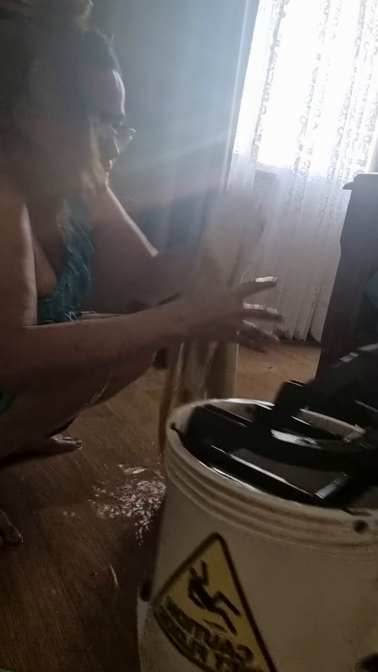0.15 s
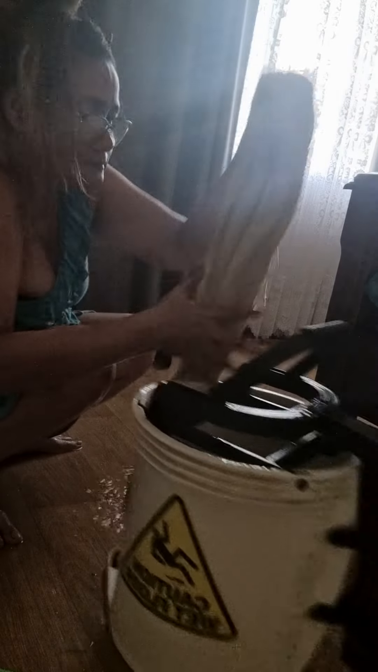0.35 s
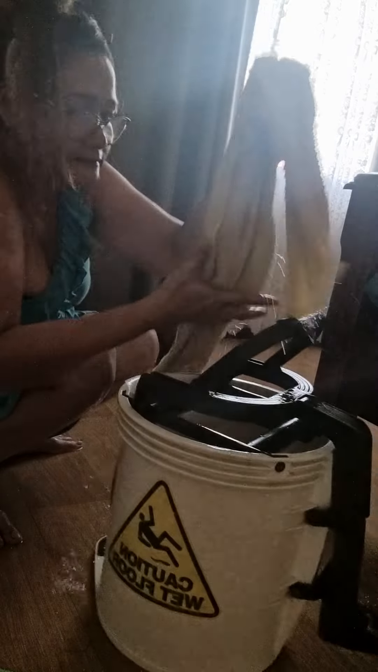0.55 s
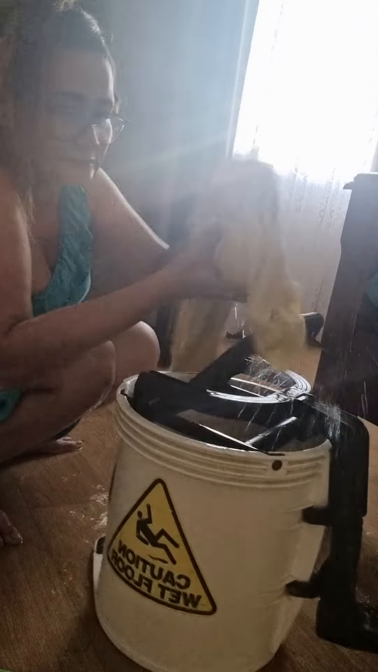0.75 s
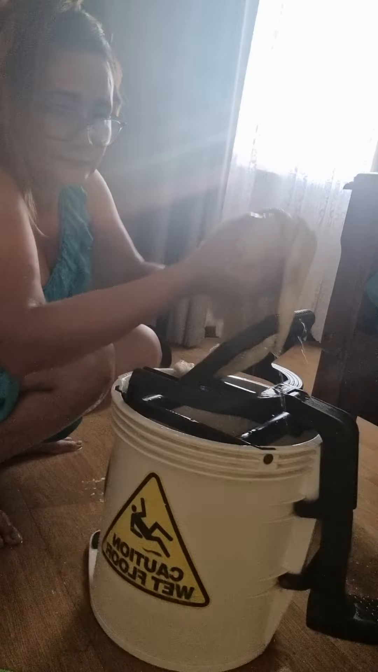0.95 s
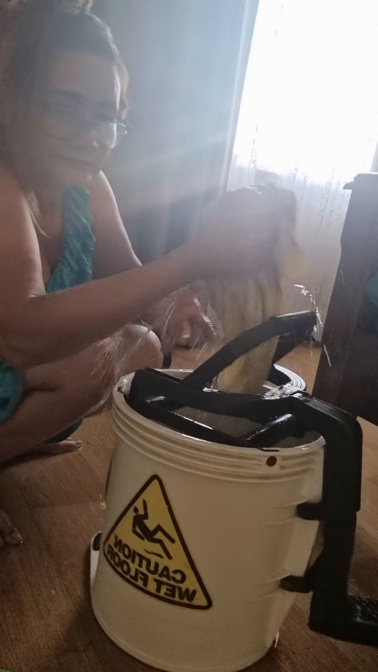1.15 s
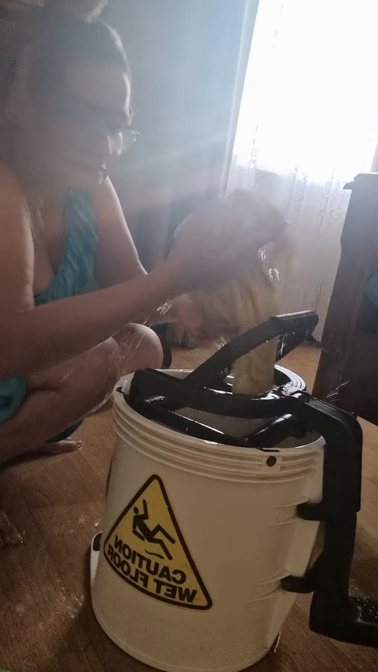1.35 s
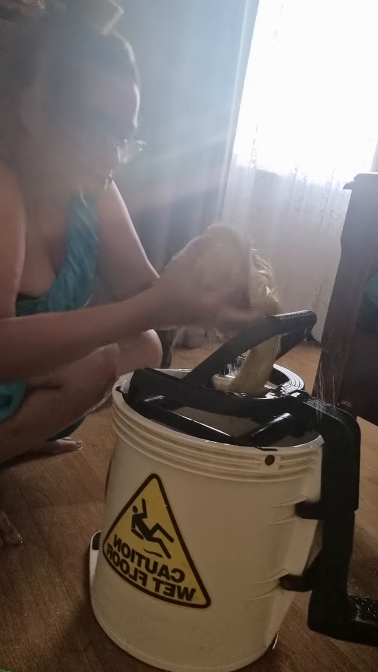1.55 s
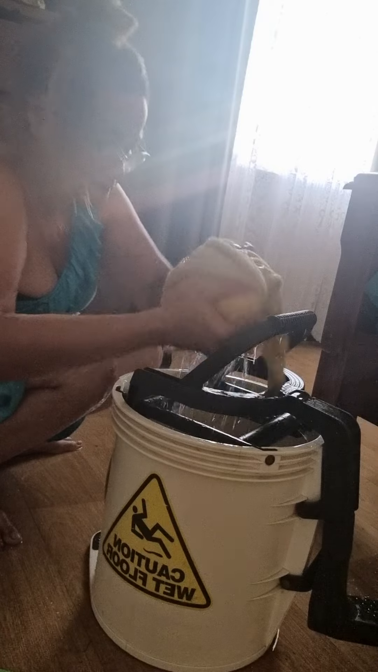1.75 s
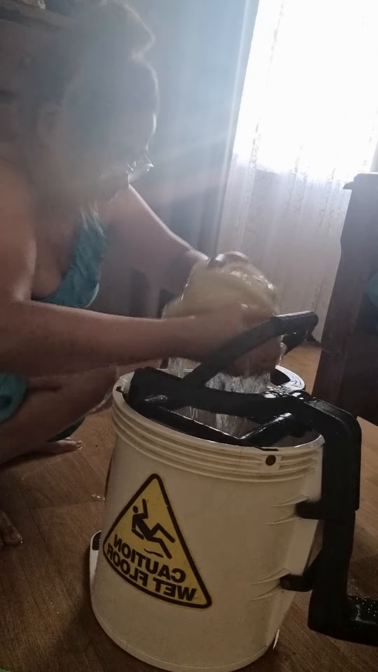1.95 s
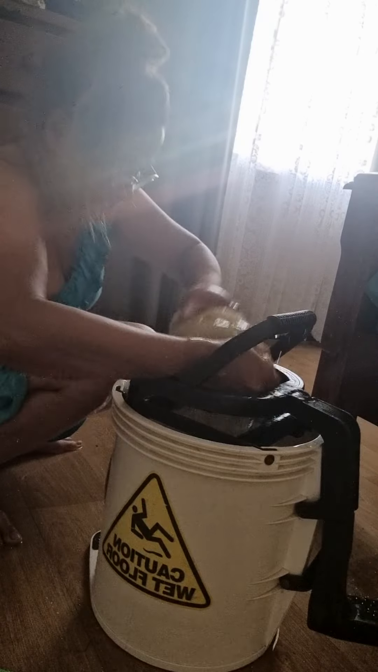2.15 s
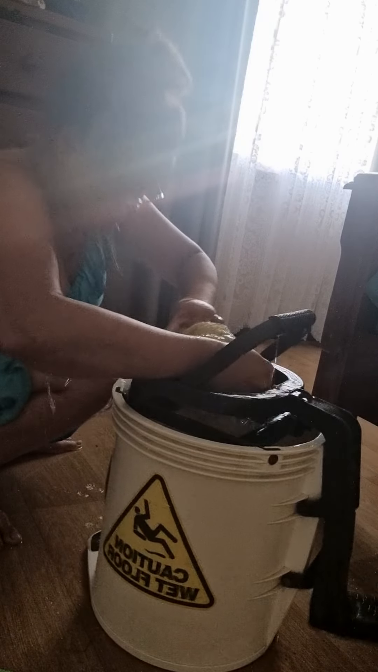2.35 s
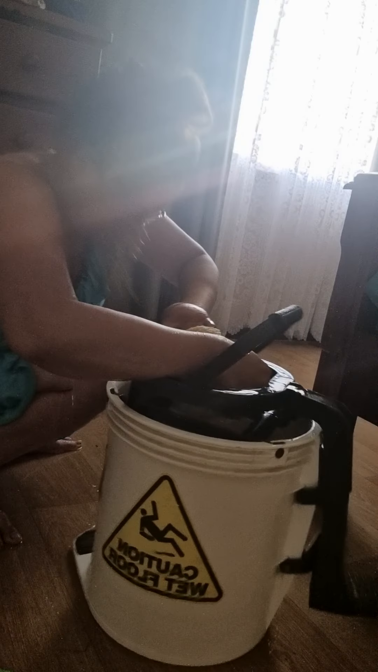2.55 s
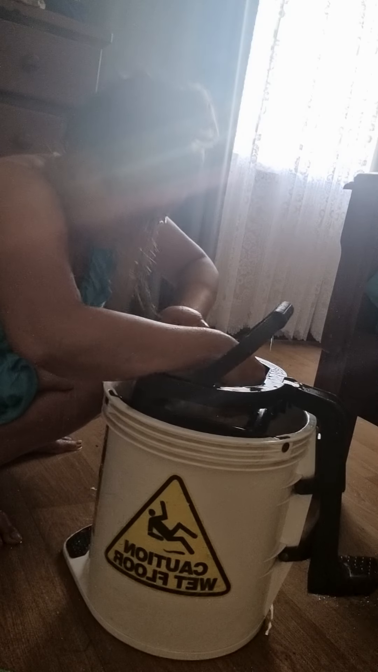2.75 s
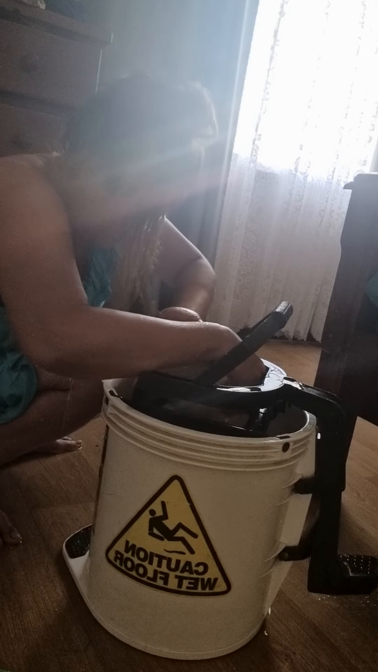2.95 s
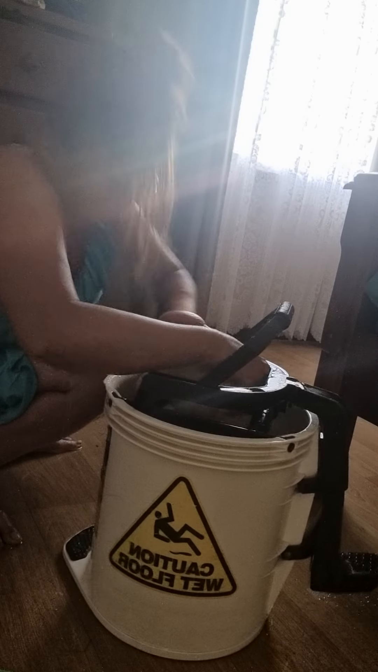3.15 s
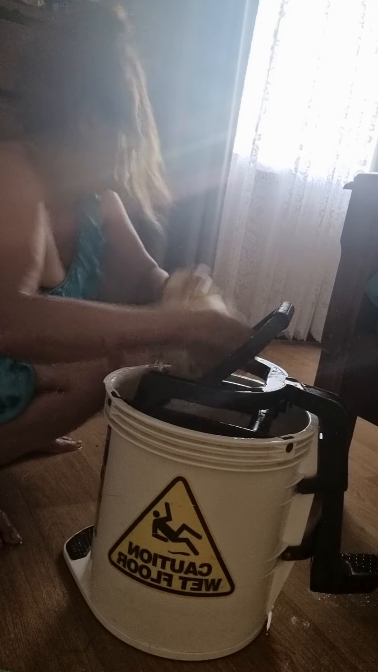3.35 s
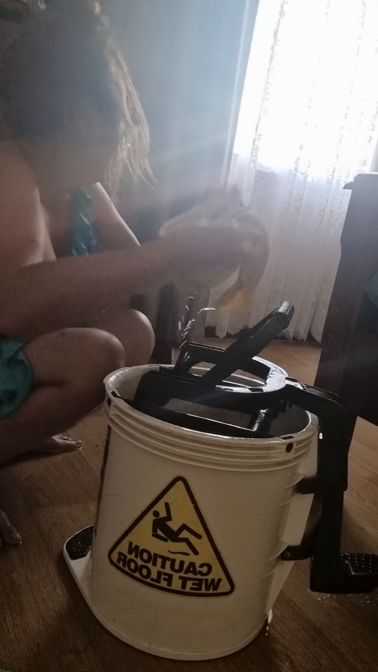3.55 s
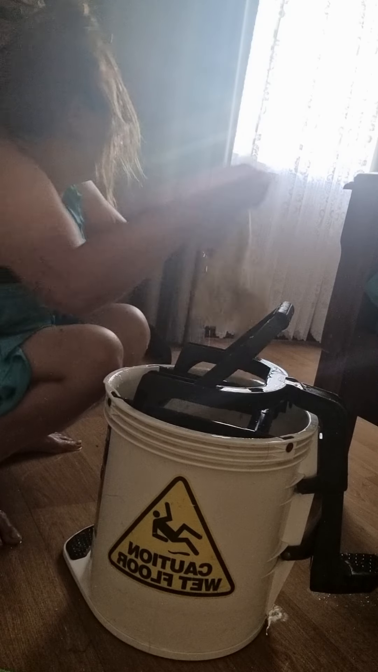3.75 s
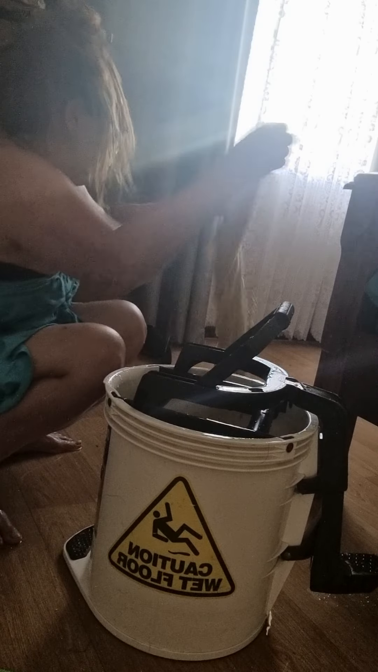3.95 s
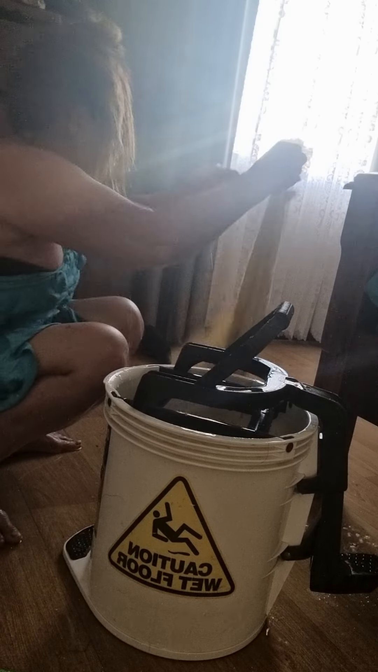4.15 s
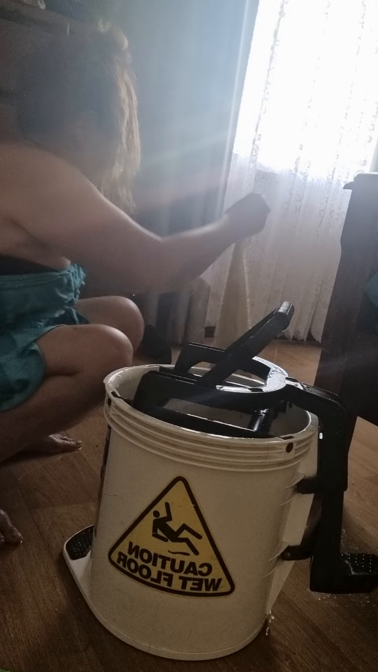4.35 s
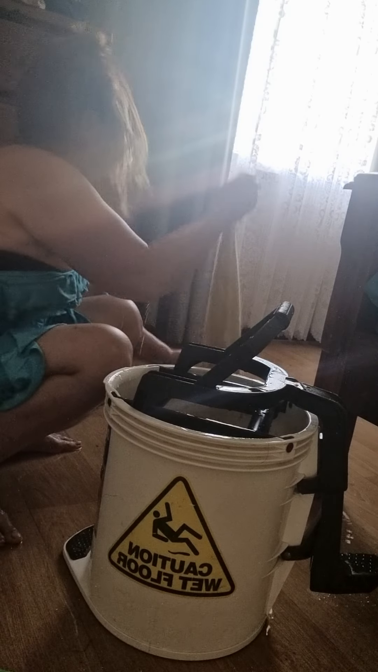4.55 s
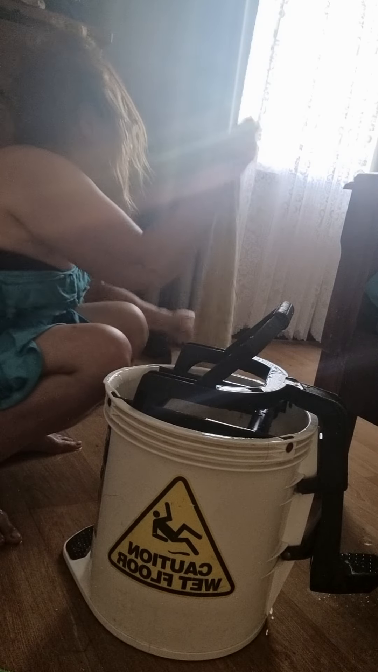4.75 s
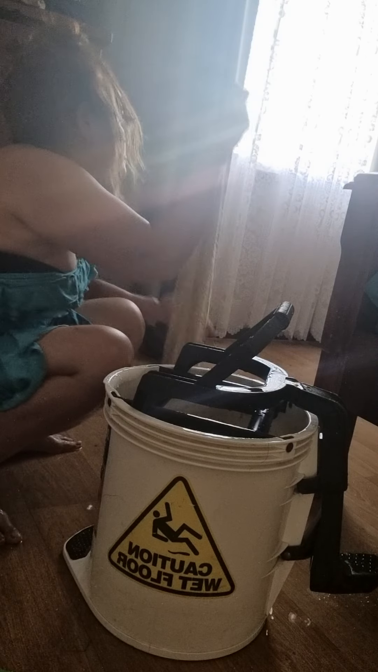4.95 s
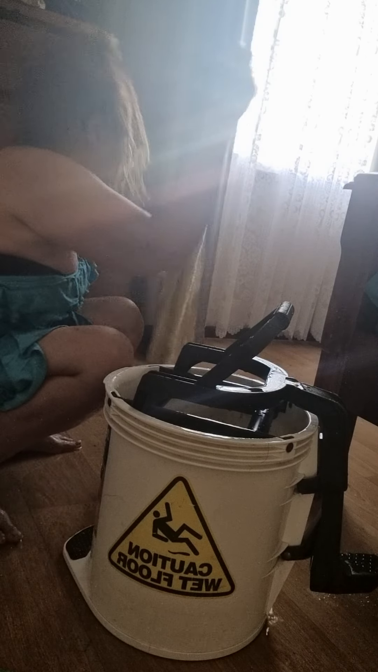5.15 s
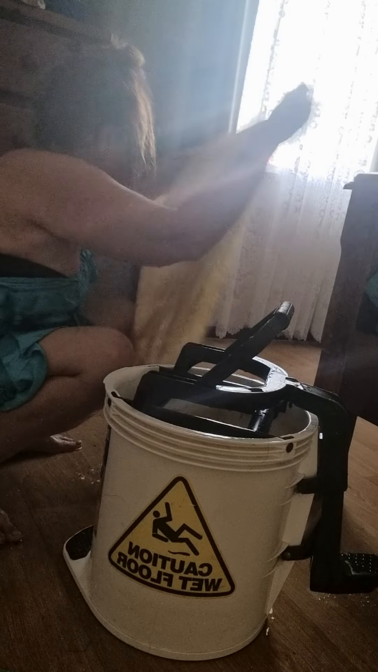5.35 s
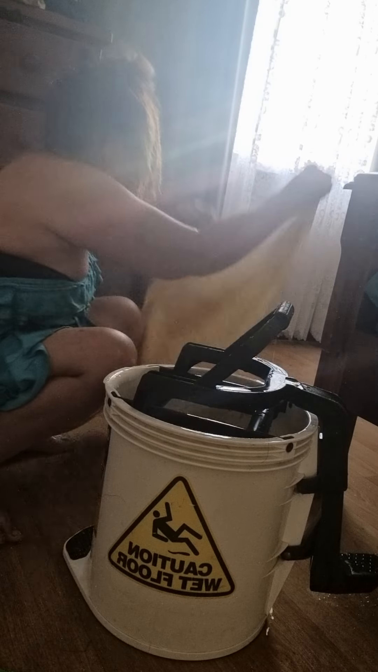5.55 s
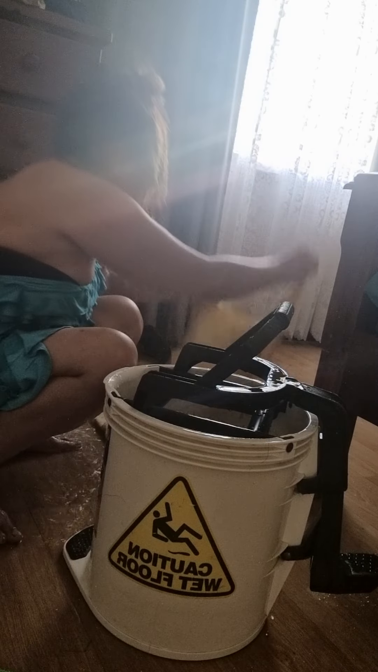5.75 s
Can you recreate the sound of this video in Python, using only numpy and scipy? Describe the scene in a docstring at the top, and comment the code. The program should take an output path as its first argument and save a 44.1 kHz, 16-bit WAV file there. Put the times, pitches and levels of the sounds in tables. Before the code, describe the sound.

A bucket rumbles and clacks at the start, with a dripping cloth swished and slapped beside it. After small splashes, one long squeeze sends a bright, gurgling rush of water into the hollow pail, among sharp plastic ticks. Shorter trickles and single bubble plops fade away. Later come a light knock and squeak, tiny wet chirps and a soft flop. Recorded near in stereo, in a small, lightly echoing indoor room.

```python
"""Small room with a wooden floor: a plastic mop bucket is dragged, and a soaked cloth is lifted and wrung over it.
Four squeezes drive plunge, spatter and spray (filtered random impacts) with bubble swarms, then drips.
Splashes, squelches, single bubbles and booming gulps are placed from tables; the cloth slaps down wet.
Plastic ticks are damped noise rings, bumps are short low tones, shoves are rumbling noise.
Wet slips chirp, rubbed plastic squeaks, and room air and a wavering hum lie beneath."""
import sys
import numpy as np
from scipy import signal
from scipy.fft import rfft, irfft, next_fast_len
from scipy.io import wavfile
from scipy.ndimage import uniform_filter1d, map_coordinates

SR = 44100
rng = np.random.default_rng(int(sys.argv[2]) if len(sys.argv) > 2 else 0)


def put_to_file(sound):
    """Save the sound as 16-bit audio at rate SR, in the file named by the first command-line argument."""
    columns = np.atleast_2d(sound).T  # one column per channel
    safe = np.clip(columns, -1, 1)
    whole_steps = np.round(safe * 32767)
    wavfile.write(sys.argv[1], SR, whole_steps.astype(np.int16))


N = 256220

# Event levels in all tables are before the mix gains; spectra are relative.
# sheets of water and wet cloth landing: start_s, rise_s, fade_s, slap_db, spatter_db, spray_db
SPLASH_EVENTS = [(0.393, 0.004, 0.04, -53, -60, -61), (0.418, 0.0013, 0.038, -41.5, -56, -51),
                 (0.452, 0.022, 0.014, -33.5, -45, -43), (0.646, 0.0023, 0.0094, -52, -61, -56),
                 (0.833, 0.02, 0.038, -49, -49.5, -52), (0.97, 0.03, 0.24, -55.5, -65, -64),
                 (1.349, 0.012, 0.12, -65, -49.5, -50), (1.474, 0.014, 0.021, -48, -52, -47.5),
                 (1.651, 0.00081, 0.058, -76.5, -49.5, -76), (1.929, 0.0021, 0.026, -53, -44, -43.5),
                 (2.074, 0.0092, 0.028, -41.5, -57, -48), (2.396, 0.006, 0.02, -36, -58, -61),
                 (2.645, 0.0049, 0.025, -51.5, -46, -46.5), (2.944, 0.0041, 0.046, -49, -57, -54),
                 (3.322, 0.0044, 0.02, -51.5, -62, -55), (3.538, 0.0046, 0.029, -57, -55, -49),
                 (3.645, 0.0051, 0.037, -78, -57.5, -60), (4.042, 0.0034, 0.052, -50.5, -48, -46),
                 (4.315, 0.0022, 0.033, -57, -64, -64), (4.341, 0.0065, 0.14, -49.5, -55.5, -54),
                 (4.478, 0.003, 0.012, -69, -62, -60), (5.734, 0.0047, 0.12, -41, -41.5, -44.5)]
# spectrum of water spattering: freq_hz, density_db
SPATTER_SPECTRUM = [(500, -14.5), (1200, -12), (2200, -16.5), (3200, 2.5), (4300, 1), (5800, 1.5),
                    (7500, -5.5), (14000, -32)]
# spectrum of fine spray, also used for tick snaps: freq_hz, density_db
SPRAY_SPECTRUM = [(2500, -15), (5500, 7), (7500, 5.5), (10500, -0.5), (12500, -0.5), (16000, -3.5)]


def amp(db):
    """Decibels to gain."""
    return 10 ** (np.asarray(db) / 20)


def unit(x):
    """Scale to rms 1."""
    return x / np.sqrt(np.mean(x ** 2) + 1e-20)


def along(points, hz):
    """Interpolate (Hz, value) points on a log frequency axis."""
    f, v = np.transpose(points)
    return np.interp(np.log(hz + 1), np.log(f + 1), v)


def since(s):
    """Seconds since a moment, zero before it."""
    return np.maximum(np.arange(N) / SR - s, 0)


def add(track, s, sound):
    """Mix a short sound in at a moment."""
    part = track[max(round(s * SR), 0):][:len(sound)]
    part += sound[:len(part)]


def together(gains):
    """Unrelated sounds add in power."""
    return np.linalg.norm(gains, axis=0)


def stroke(s, rise, hold, fall_db_per_s):
    """A smooth rise, a hold and a steady fall in dB."""
    swell = np.sin(np.pi / 2 * np.minimum(since(s) / rise, 1)) ** 2
    return swell * amp(-fall_db_per_s * since(s + rise + hold))


def wobble(rate):
    """A smooth random curve, rate knots a second."""
    knots = rng.standard_normal(int(N * rate / SR) + 4)
    return map_coordinates(knots, [np.arange(N) * rate / SR])


def clumped(x, rate, depth_db):
    """Random level swings, about rate a second, bunch the sound; rms 1."""
    return unit(x * amp(depth_db * wobble(rate)))


def filtered(x, response):
    """x times a complex response of frequency."""
    size = 2 * next_fast_len((N + SR // 2) // 2)
    return irfft(rfft(x, size) * response(np.fft.rfftfreq(size, 1 / SR)), size)[..., :N]


def coloured(x, spectrum, size=8192):
    """x through a minimum-phase filter with this spectrum, at rms 1."""
    magnitude = amp(along(spectrum, np.fft.rfftfreq(size, 1 / SR)))
    cepstrum = irfft(np.log(magnitude))
    # fold the cepstrum to make the filter causal
    cepstrum[1:size // 2] *= 2
    cepstrum[size // 2 + 1:] = 0
    impulse = irfft(np.exp(rfft(cepstrum)))
    return unit(signal.oaconvolve(x, impulse)[:N])


def resonant(x, modes):
    """x through (Hz, width Hz, dB) resonances, at rms 1."""
    def response(f):
        return sum(amp(db) * 1j * f * w / (c * c - f * f + 1j * f * w) for c, w, db in modes)
    return unit(filtered(x, response))


def impacts(rate, scatter_db):
    """Droplets landing at random, rate a second, with scattered strengths; rms 1."""
    chance, size = rng.random(N), rng.standard_normal(N)
    strength = amp(scatter_db * np.clip(size, -2, 2))
    return unit((chance < rate / SR) * rng.choice([-1, 1], N) * strength)


def bubble(t, hz, t60, glide):
    """A bubble rings, its pitch rising by the share glide over t60 as it nears the surface."""
    age = t / t60
    tone = np.sin(2 * np.pi * hz * t * (1 + glide * age / 2))
    return tone * np.exp(-float(np.log(1000)) * age) * (1 - np.exp(-t * hz))


def bubbles(rate, centre_hz, octaves, cycles, scatter_db, glide):
    """A steady swarm of bubbles, their pitches spread around a centre, at rms 1."""
    draws = rng.random((int(rate * N / SR), 4))
    when, pitch, life, size = draws.T[:, :, None]
    spread = octaves * np.log(pitch / (1 - pitch)) / 2
    hz = np.clip(centre_hz * 2 ** spread, 250, 12000)
    t60 = cycles * (.5 + life) / hz
    n = np.arange(min(int(SR * cycles / centre_hz), SR // 25))
    rings = bubble(np.float32(n / SR), np.float32(hz), np.float32(t60), float(glide))
    strength = amp(scatter_db * np.minimum(-np.log(size), 3))
    places = (when * N).astype(int) + n
    return unit(np.bincount(places.ravel(), (strength * rings).ravel(), N)[:N])


def stream():
    """Wrung water plunges into the pail, traps bubbles and spatters on the wringer, in uneven spurts."""
    # air in the bucket: freq_hz, width_hz, level_db
    pail_modes = [(291, 51, 3), (390, 13, -2.5), (750, 54, 6.5), (867, 16, -1), (1026, 30, 1.5),
                  (1250, 29, 4.5), (2100, 1350, -6.5)]
    # spectrum of water plunging in: freq_hz, density_db
    plunge_spectrum = [(120, -23), (170, 9), (215, -12), (290, -9), (400, 13), (600, -5.5), (780, -15),
                       (1300, 4), (2000, -17), (4000, -5)]
    plunge, spatter, spray = wringing()
    spurts = amp(1.0 * wobble(26))
    drops = clumped(impacts(rate=700, scatter_db=3), rate=22, depth_db=2.5)
    hollow = amp(-7.0) * coloured(drops, plunge_spectrum) + amp(-3.0) * resonant(drops, pail_modes)
    gurgle = bubbles(rate=220, centre_hz=1450, octaves=0.45, cycles=26, scatter_db=1.2, glide=0.55)
    glugs = bubbles(rate=110, centre_hz=647, octaves=0.564, cycles=12.7, scatter_db=2.0, glide=0.39)
    fizz = bubbles(rate=760, centre_hz=2650, octaves=0.42, cycles=40, scatter_db=2.1, glide=0.2)
    hits = impacts(rate=1150, scatter_db=3.2)
    in_pail = hollow + amp(-11.5) * glugs + amp(-5) * gurgle
    on_wringer = amp(-6.5) * coloured(hits, SPATTER_SPECTRUM) + amp(-5.0) * fizz
    mist = amp(-2.5) * coloured(hits, SPRAY_SPECTRUM)
    return spurts * (plunge * in_pail + spatter * on_wringer + spray * mist)


def wringing():
    """Strength of plunge, spatter and spray: all follow the flow that the squeezes press out."""
    # squeezes of the cloth: start_s, rise_s, hold_s, flow_db, plunge_re_flow_db
    squeezes = [(1.72, 0.53, 0.41, -42, -8), (2.722, 0.024, 0.093, -48.5, -8), (2.86, 0.22, 0.19, -58, 0.5),
                (3.289, 0.051, 0.14, -54.5, -2)]
    emptying_db_per_s, let_go_db_per_s = 14, 91  # cloth empties; grip eases
    plunge_lag_s = 0.072  # water runs over the wringer before it reaches the pail
    spray_re_flow_db, spray_sag_db_per_s = -7, 8  # spray is strongest as a squeeze begins
    layers = []
    for s, rise, hold, db, plunge_db in squeezes:
        flow, arriving = [amp(db - emptying_db_per_s * since(start + rise))
                          * stroke(start, rise, hold, let_go_db_per_s)
                          for start in (s, s + plunge_lag_s)]
        spray = amp(spray_re_flow_db - spray_sag_db_per_s * since(s + rise)) * flow
        layers.append([amp(plunge_db) * arriving, flow, spray])
    return together(layers)


def patter():
    """The lifted or shaken cloth sheds small drops, and more fall back after every splash."""
    # lifts and shakes of the cloth: start_s, rise_s, hold_s, patter_db, mist_db
    lifts = [(-0.03, 0.019, 0.14, -55.5, -61.5), (0.24, 0.023, 0.11, -61, -72),
             (0.85, 0.06, 0.19, -56.5, -68), (1.16, 0.041, 0.31, -59, -60.5), (1.4, 0.05, 0.48, -61.5, -57),
             (3.777, 0.023, 0.39, -66.5, -64.5), (5.184, 0.29, 0.6, -61, -65.5)]
    drip_dies_db_per_s = 112
    fallback_db, fallback_mist_db = -10, -18.5  # relative to the splash's spatter and spray
    fallback_rise_s, fallback_db_per_s = 0.027, 39.5
    shed = [amp([[db], [mist_db]]) * stroke(s, rise, hold, drip_dies_db_per_s)
            for s, rise, hold, db, mist_db in lifts]
    thrown = [amp([[db + fallback_db], [spray_db + fallback_mist_db]])
              * stroke(s, fallback_rise_s, 0, fallback_db_per_s)
              for s, _, _, _, db, spray_db in SPLASH_EVENTS]
    drip, mist = together(shed + thrown)
    hits = impacts(rate=560, scatter_db=3.2)
    swarm = bubbles(rate=200, centre_hz=2750, octaves=0.5, cycles=28, scatter_db=2, glide=0.3)
    pings = clumped(swarm, rate=45, depth_db=2)
    drops = amp(-10.0) * coloured(hits, SPATTER_SPECTRUM) + amp(-11) * pings
    return drip * drops + mist * amp(-7.0) * coloured(hits, SPRAY_SPECTRUM)


def splashes():
    """Each splash is a brief cloud of impacts and tiny bubbles over a dull slap."""
    # spectrum of the slap: freq_hz, density_db
    slap_spectrum = [(100, -18.5), (280, -3.5), (600, -6), (1000, -0.5), (1400, 0.5), (2500, -4),
                     (6000, -24.5)]
    levels = np.zeros((3, N))
    t = np.arange(SR // 2) / SR
    for s, rise, fade, *dbs in SPLASH_EVENTS:
        swell = (1 - np.exp(-(t / rise) ** 2)) * np.exp(-t / fade)
        for level, db in zip(levels, dbs):
            add(level, s, amp(db) * swell / swell.max())
    slap, spatter, spray = levels
    hits = impacts(rate=3500, scatter_db=2.5)
    fizz = bubbles(rate=620, centre_hz=2978, octaves=0.447, cycles=50, scatter_db=5.0, glide=0.32)
    thud = amp(-7.5) * coloured(impacts(rate=2500, scatter_db=-0.5), slap_spectrum)
    drops = amp(-3.0) * coloured(hits, SPATTER_SPECTRUM) + amp(-6.0) * fizz
    return slap * thud + spatter * drops + spray * amp(-5.0) * coloured(hits, SPRAY_SPECTRUM)


def squelches(count=36, octaves=0.18, cycles=14):
    """Tiny bubbles of nearly one size burst in a quick run that swells and thins."""
    # wet cloth and bursting water films: start_s, level_db, pitch_hz, fade_s
    squelch_events = [(0.257, -54, 2140, 0.0085), (0.393, -55, 1140, 0.014), (0.459, -41.5, 1300, 0.011),
                      (0.597, -53, 3100, 0.0095), (0.644, -49.5, 3910, 0.013), (0.796, -53.5, 3760, 0.0052),
                      (0.856, -50.5, 2520, 0.016), (1.06, -56, 1960, 0.032), (1.202, -56, 2780, 0.015),
                      (1.356, -42.5, 3340, 0.012), (1.388, -44.5, 4770, 0.012), (1.483, -41.5, 2390, .014),
                      (1.740, -49.5, 4300, 0.0074), (1.873, -41.5, 3100, 0.009),
                      (2.024, -34.5, 2960, 0.011), (2.119, -38.5, 2800, 0.014), (2.029, -45, 5500, 0.014),
                      (2.18, -48, 5700, 0.018), (2.275, -42.5, 3400, 0.0098), (2.298, -38, 1420, 0.013),
                      (2.478, -41.5, 2200, 0.011), (2.636, -42.5, 2060, 0.0096), (3.004, -52, 5170, .013),
                      (3.421, -62, 2040, .01), (4.108, -51, 3760, 0.021), (5.312, -59.5, 3130, 0.0071),
                      (5.325, -53.5, 2080, 0.016), (5.367, -48.5, 1390, 0.0095), (5.38, -60.5, 900, .012),
                      (5.378, -51.5, 2610, 0.026), (5.559, -67.5, 1090, 0.011), (5.644, -57.5, 3040, 0.02),
                      (5.697, -64, 3800, 0.016)]
    out, t = np.zeros(N), np.arange(SR // 40) / SR
    for s, db, hz, fade in squelch_events:
        knot = np.zeros(SR // 3)
        for k, (slip, size, pitch) in enumerate(rng.standard_normal((count, 3))):
            age = 3 * abs(k + .4 * slip) / count  # in fade times
            f = hz * 2 ** (octaves * pitch)
            strength = np.sign(slip) * amp(2 * size) * np.tanh(k / 2) * np.exp(-age)
            add(knot, age * fade, strength * bubble(t, f, cycles / f, glide=0.1))
        add(out, s, amp(db) * knot * np.sqrt(fade * SR / 2 / np.sum(knot ** 2)))
    return out


def plops():
    """Big drops trap single bubbles that sing above the rest; those near the surface glide up."""
    # single bubbles: start_s, level_db, pitch_hz, t60_s, pitch_rise_share over t60
    plop_events = [(0.068, -46.5, 1200, .035, 0.05), (0.643, -44.5, 2220, 0.023, 0),
                   (1.028, -49.5, 1860, .04, 0), (1.239, -56, 2360, .035, 0),
                   (1.268, -53, 2810, 0.023, 0.2), (1.302, -51, 2260, 0.027, 0.1),
                   (1.360, -37.5, 3230, 0.037, 0.03), (1.404, -40, 2270, 0.05, .034),
                   (1.485, -44.5, 801, 0.21, 0.04), (1.541, -49.5, 2700, 0.084, 0.06),
                   (1.644, -51.5, 1590, 0.019, .4), (1.785, -49.5, 1027, 0.074, 0.36),
                   (1.785, -55, 1394, .03, 0), (1.803, -54, 1410, .04, .6), (1.816, -52, 2060, .035, .5),
                   (1.838, -51, 2170, .06, 0.3), (1.858, -52, 1480, .03, 0.4),
                   (1.89, -45.5, 2250, 0.085, 0.06), (1.914, -43, 3700, 0.033, .05),
                   (1.961, -39, 1280, 0.054, 0.08), (1.985, -44, 2100, .025, .4),
                   (1.997, -35, 1790, .033, .045), (2.031, -47, 1250, .05, 0),
                   (2.083, -40, 1257, .08, 0.04), (2.104, -37.5, 790, 0.037, .1),
                   (2.172, -41.5, 457, 0.032, 0.9), (2.197, -37.5, 848, 0.083, 0.08),
                   (2.238, -38, 2200, .035, 0.1), (2.268, -39, 427, 0.034, 0.4),
                   (2.279, -35.5, 462, 0.036, 0.14), (2.297, -41, 1320, 0.03, 0.4),
                   (2.329, -35, 2700, 0.038, .1), (2.343, -39.5, 1270, 0.1, 0.04),
                   (2.350, -32.5, 2410, 0.035, 0.1), (2.397, -38, 1170, 0.034, .2),
                   (2.41, -35, 2710, .03, 0.03), (2.41, -42, 720, 0.12, 0.01),
                   (2.416, -39, 1250, 0.046, .25), (2.476, -38, 1470, 0.05, 0),
                   (2.498, -38, 1535, 0.068, .05), (2.523, -35, 1010, 0.036, 0.48),
                   (2.561, -36, 2290, 0.03, 0), (2.595, -41, 1230, 0.061, .15),
                   (2.625, -39.5, 1110, 0.04, 0.25), (2.792, -41.5, 1105, 0.054, 0),
                   (2.865, -48.5, 720, 0.054, 0.13), (2.875, -45, 1180, 0.037, .1),
                   (2.92, -59, 1000, 0.027, .6), (2.972, -44, 1226, 0.035, .05),
                   (3.002, -47, 2450, .025, .1), (3.037, -47, 1700, 0.1, .01), (3.069, -51, 1020, 0.065, 0),
                   (3.122, -43.5, 880, .08, 0.82), (3.156, -44, 1580, 0.032, 0.45),
                   (3.168, -44, 1950, .03, .2), (3.251, -46, 2440, 0.022, 0), (3.282, -53, 1220, 0.064, 0),
                   (3.324, -45, 780, 0.075, 0.03), (3.35, -45, 1000, .035, 0.4),
                   (3.374, -43.5, 1260, 0.06, 0), (3.422, -49, 1800, 0.022, .1),
                   (3.471, -42.5, 1440, 0.032, .044), (3.488, -45, 743, .04, 0.17),
                   (3.547, -47.5, 434, .05, 0.34), (3.556, -48, 1250, .035, 0.1),
                   (3.565, -45, 783, 0.035, 0.06), (3.585, -45.5, 1695, 0.13, 0.07),
                   (3.61, -46.5, 874, 0.035, 0), (3.897, -61, 1735, 0.14, 0.05)]
    out, t = np.zeros(N), np.arange(SR // 3) / SR
    for s, db, hz, t60, glide in plop_events:
        add(out, s, amp(db) * bubble(t, hz, t60, glide))
    return out


def gulps():
    """Each slug of water thumps the air in the pail, which booms roughly at its lowest resonance."""
    # slugs of water: start_s, hold_s, level_db
    gulp_events = [(0.938, .02, -63), (1.385, 0.011, -47.5), (1.714, 0.14, -70.5), (1.92, 0.023, -61.5),
                   (2.07, 0.018, -55.5), (2.168, 0.0092, -59), (2.27, 0.013, -56), (2.383, 0.013, -54),
                   (2.467, 0.045, -46.5), (2.58, 0.047, -54), (2.849, 0.025, -54.5), (2.97, 0.064, -61),
                   (3.148, 0.028, -57.5), (3.312, .08, -59.5), (3.48, 0.048, -63.5)]
    # spectrum of water heaving in the pail: freq_hz, density_db
    churn_spectrum = [(90, -21), (175, -3.5), (380, 0), (520, -8), (750, -3), (1300, -28), (3000, -42)]
    boom_hz, rise_s, fall_db_per_s = 296, 0.011, 260
    swell = together([amp(db) * stroke(s, rise_s, hold, fall_db_per_s) for s, hold, db in gulp_events])
    phase = 2 * np.pi * boom_hz * since(0) + .35 * wobble(60)
    boom = amp(2.0 * wobble(70)) * np.sin(phase)
    churn = coloured(impacts(rate=900, scatter_db=2.5), churn_spectrum)
    return swell * (amp(-.5) * boom + amp(-9) * churn)


def crackle():
    """Separate drops strike the bare plastic with dry pips; they stand out most when the flow is thin."""
    plunge, spatter, _ = wringing()
    full = amp(-47.5)  # above this flow the separate drops merge into a stream
    pips = bubbles(rate=120, centre_hz=2600, octaves=0.6, cycles=12, scatter_db=1.8, glide=0.15)
    return amp(-8) * full * np.tanh(together([plunge, spatter]) / full) * pips


def ticks():
    """A tick is a sharp snap and a burst of damped plastic ringing around one pitch, panned along the rim."""
    # drops and parts on the plastic: start_s, level_db, ring_hz, snap_re_level_db, left_minus_right_db
    tick_events = [(0.044, -38.5, 1160, -27, 3), (0.255, -36.5, 2280, -16.5, -2),
                   (0.418, -31.5, 1880, -12, -4), (0.466, -29, 1160, -20, -5), (0.468, -34, 2670, -15, -5),
                   (0.823, -46.5, 810, -30, -5), (0.823, -44, 1700, -10, 2), (0.974, -35, 3750, -7.5, -7),
                   (1.07, -36, 4550, -2.5, -6), (1.357, -37.5, 3370, -18, 5), (1.434, -37, 725, -9, 0),
                   (1.653, -27.5, 5400, -30, 0), (1.653, -38.5, 2900, -25, 0), (1.872, -28.5, 2600, -15, 5),
                   (1.934, -42.5, 900, -12, 0), (2.026, -32, 2970, -18, 0), (2.111, -29, 2500, -22, -2),
                   (2.121, -28, 2800, -18, 0), (2.227, -31, 3500, -8, -7), (2.479, -34, 1900, -24, 0),
                   (2.522, -32.5, 3000, -5.5, 2), (2.572, -27, 2660, -12, -2),
                   (2.637, -29.5, 1910, -14, -2), (2.789, -31, 2080, -5.5, -2), (2.803, -36, 2000, -8, 0),
                   (3.004, -49, 2500, -8, 0), (3.076, -38.5, 2420, -20, 0), (3.171, -45, 1950, -22, 3),
                   (3.268, -43, 1310, -6, -4), (3.328, -42, 2560, -17, 0), (3.406, -41, 1480, -13, 0),
                   (3.439, -42, 1500, -18, 0), (3.921, -59, 3560, -9, 0), (4.343, -46, 2520, -2, 0),
                   (4.364, -30, 1130, -14, 1), (4.439, -49, 800, -20, 0), (4.479, -44, 1600, -16, 2),
                   (4.491, -40.5, 1670, -12, 0), (4.492, -42, 4000, -12, -2), (5.508, -50, 2250, -22, 0),
                   (5.564, -57.5, 1090, -14, -2), (5.645, -43, 2400, -12, -7), (5.739, -32.5, 1070, -27, 0),
                   (5.724, -49, 7000, -8, 0), (5.743, -37, 4830, -6, -3)]
    rings, snaps = np.zeros((2, 2, N))
    t = np.arange(SR // 12) / SR
    for s, db, hz, snap_db, pan_db in tick_events:
        life = 0.001 + 2.4 / hz
        contact = rng.standard_normal(len(t)) * np.exp(-t / life) * (1 - np.exp(-t / 0.0004))
        band = np.clip(hz * 2 ** (np.array([-1, 1]) * 0.32), 100, 15000)
        ring = signal.sosfilt(signal.butter(2, band, "bandpass", fs=SR, output="sos"), contact)
        ring *= np.sqrt(life * SR / 2) / np.linalg.norm(ring)
        for side, side_db in enumerate([db + pan_db / 2, db - pan_db / 2]):
            add(rings[side], s, amp(side_db) * ring)
            add(snaps[side], s, amp(side_db + snap_db - 4.0 - 60 * t / 0.012))  # t60 12 ms
    return amp(-7.0) * rings + snaps * coloured(rng.standard_normal(N), SPRAY_SPECTRUM)


def bucket():
    """The bucket rumbles unevenly with each shove and bumps dully on the boards; the wet cloth thumps down
    once."""
    # shoves over the floor: start_s, length_s, rumble_db
    shoves = [(-0.01, 0.021, -48), (0.076, 0.11, -55.5), (0.27, 0.21, -52), (0.49, 0.096, -62)]
    # dull bumps on the boards, and a thump of the wet cloth at 5.257 s: start_s, peak_db, pitch_hz
    bumps = [(0.002, -42, 85), (0.034, -46.5, 131), (0.091, -46.5, 112), (0.142, -46, 114),
             (0.256, -44, 123), (0.315, -46, 99.6), (0.391, -40, 91), (0.413, -50, 186), (0.493, -47, 81),
             (0.544, -45, 81), (0.611, -54, 72), (2.094, -48, 91), (2.311, -44, 91.6), (2.78, -47, 98),
             (3.374, -55.5, 91), (4.435, -59, 89), (5.257, -64, 186), (5.3, -58, 91.5), (5.735, -54, 87),
             (5.742, -53, 178)]
    # spectrum of the sliding bucket: freq_hz, density_db
    rumble_spectrum = [(25, -45), (40, -37), (62, 1.5), (90, -1.5), (125, -5.5), (170, -8), (216, -21.5),
                       (290, -4.5), (370, -19), (550, -21.5), (1100, -25), (1800, -32), (4000, -51)]
    shove_rise_s, shove_stop_db_per_s = 0.011, 104
    bump_rise_cycles = 1.61
    sliding = together([amp(db) * stroke(s, shove_rise_s, length - shove_rise_s, shove_stop_db_per_s)
                        for s, length, db in shoves])
    rumble = coloured(rng.standard_normal(N), rumble_spectrum)
    out = sliding * clumped(rumble, rate=45, depth_db=3.5)
    t = np.arange(SR // 6) / SR
    for s, db, hz in bumps:
        age = t * hz / bump_rise_cycles
        swell = age * np.exp((1 - age ** 2) / 2)  # peaks at age 1
        add(out, s, amp(db) * swell * np.sin(2 * np.pi * hz * t))
    return out


def chirps():
    """A slip of wet skin or cloth sings one rough, slightly falling note."""
    # slips: start_s, hold_s, level_db, pitch_hz
    chirp_events = [(0.083, 0.016, -59, 5650), (0.12, .01, -55, 2980), (0.156, .01, -62, 2490),
                    (4.67, .006, -63.5, 5130), (4.73, 0.01, -67.5, 4000), (4.778, .008, -67, 6350),
                    (5.265, .008, -65, 2115), (5.386, 0.035, -51.5, 2460), (5.507, .004, -53, 2260),
                    (5.514, .01, -67, 1500), (5.584, .005, -65, 1990), (5.664, .01, -60, 3580),
                    (5.708, 0.011, -60, 3800)]
    rise_s, fall_db_per_s = 0.0012, 400
    sag_share_per_s, rough_share = 0.13, 0.03  # pitch fall and shake
    out, t = np.zeros(N), np.arange(SR // 5) / SR
    for s, hold, db, hz in chirp_events:
        shape = stroke(0, rise_s, hold, fall_db_per_s)[:len(t)]
        shake = unit(uniform_filter1d(rng.standard_normal(len(t)), size=90))
        pitch = hz * (1 - sag_share_per_s * t + rough_share * shake)
        add(out, s, amp(db - 4.5) * shape * np.sin(2 * np.pi * np.cumsum(pitch) / SR))
    return out


def squeak():
    """Wet plastic is rubbed for a moment and rings."""
    # rubbed plastic: freq_hz, width_hz, level_db
    wringer_modes = [(573, 55, -4), (1000, 400, -31), (1605, 140, 7), (2400, 440, -6), (3950, 390, -33),
                     (12100, 1500, -5)]
    rub = since(4.475)
    pressure = np.tanh(rub / 0.011) * np.exp(-(rub / 0.05) ** 2)
    return amp(-47.5) * pressure * resonant(impacts(rate=600, scatter_db=2.0), wringer_modes)


def background():
    """Quiet room air and the wavering hum of an appliance."""
    # spectrum of the room air: freq_hz, density_db
    air_spectrum = [(15, -62), (25, -22.5), (99, 5.5), (160, -17), (495, -8), (614, -16), (871, -14.5),
                    (1530, -22), (2170, -20), (10600, -32), (15500, -29)]
    pair = np.array([coloured(rng.standard_normal(N), air_spectrum) for _ in range(2)])
    air = unit(diffuse(pair))
    phase = 2 * np.pi * 101 * since(0) + .5 * wobble(1.4)
    hum = amp(-75 + 2.06 * wobble(2.95)) * np.sin(phase)
    return amp(-70.5) * air + hum


def room(x, wet_db, early_db):
    """Each drop lands somewhere else, so the pattern of reflections keeps changing."""
    hop = SR // 11
    lead_in = np.pad(np.atleast_2d(x).mean(axis=0), (hop, 2 * hop))
    wet = np.zeros((2, N + hop))
    # overlapping pieces, each with a fresh echo
    for start in range(0, N + hop, hop):
        piece = lead_in[start:start + 2 * hop] * np.hanning(2 * hop)
        for side, answer in zip(wet, echo(wet_db, early_db)):
            add(side, start / SR, signal.fftconvolve(piece, answer))
    return x + wet[:, hop:]


def echo(wet_db, early_db):
    """Bucket and floor scatter the treble at once; then bare walls answer, each frequency with its own decay."""
    # decay of the room: freq_hz, t60_s
    room_decay = [(100, 0.26), (500, 0.36), (1500, 0.21), (4000, 0.45), (12000, 0.38)]
    hz, t, z = signal.stft(rng.standard_normal((2, SR // 2)), SR, nperseg=256)
    decay = amp(-60 * t / along(room_decay, hz)[:, None])
    tail = signal.istft(z * decay, SR, nperseg=256)[1]
    first = np.exp(-np.arange(tail.shape[1]) / SR / 0.0035)
    highpass = signal.butter(1, 2000, "highpass", fs=SR)
    early = signal.lfilter(*highpass, rng.standard_normal(tail.shape) * first)
    tail = tail * (1 - first)
    late = amp(wet_db) * tail / np.linalg.norm(tail[0])
    return diffuse(late + amp(early_db) * early / np.linalg.norm(early[0]))


def diffuse(pair):
    """Mix two unrelated signals to left and right with a set likeness at each frequency."""
    # left-right likeness of diffuse sound: freq_hz, correlation (-1 to 1)
    likeness = [(100, 0.78), (300, 0.74), (700, 0.14), (1500, -0.23), (4000, -0.061), (12000, -0.24)]
    size = 2 * next_fast_len(pair.shape[1] // 2 + 256)
    turn = np.arccos(np.clip(along(likeness, np.fft.rfftfreq(size, 1 / SR)), -1, 1)) / 2
    mid, side = irfft(rfft(pair, size) * [np.cos(turn), np.sin(turn)])[:, :pair.shape[1]]
    return np.array([mid + side, mid - side])


def scene():
    """Water and bucket in the room; ticks at the rim and single bubbles get less echo than the other water."""
    wet_sounds = stream() + patter() + splashes() + squelches() + chirps() + amp(1.5) * squeak()
    water = amp(-3.0) * room(wet_sounds, wet_db=3.5, early_db=4.0)
    rim = room(ticks() + crackle(), wet_db=0.5, early_db=-5.0)
    singing = amp(-1.5) * room(plops(), wet_db=1.0, early_db=-5.0)
    return water + rim + singing + gulps() + bucket() + background()


def record(dry):
    """Left and right differ a little in colour; nothing is kept above the band limit."""
    # stereo tilt: freq_hz, left_minus_right_db
    lean = [(60, -1), (120, -2.5), (240, -2.5), (480, -2), (950, -2.0), (1890, -1.0), (3770, -0.5),
            (7520, 1.0), (15000, -4.5)]
    top_hz = 15900
    halves = np.array([[.5], [-.5]])
    return filtered(dry, lambda hz: amp(along(lean, hz) * halves) * (hz < top_hz))


dry = scene()
out = record(dry)
put_to_file(out)
```